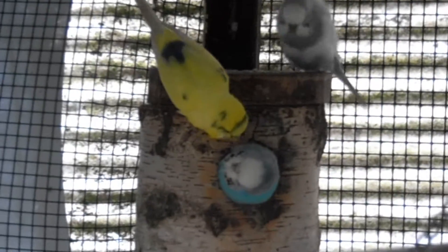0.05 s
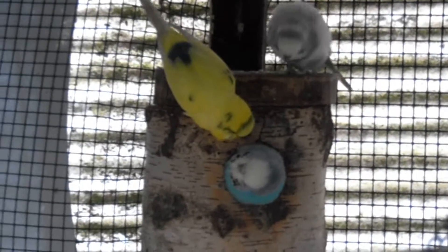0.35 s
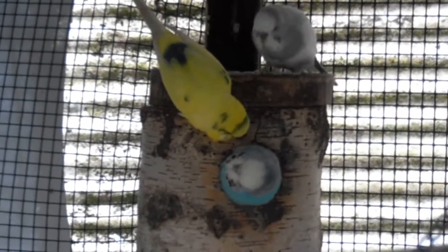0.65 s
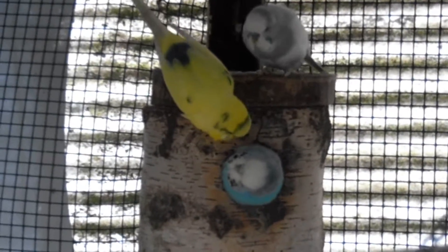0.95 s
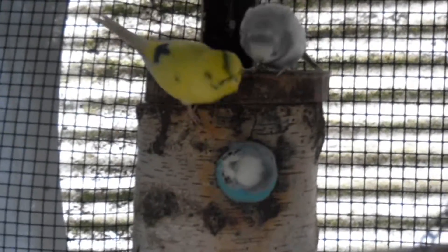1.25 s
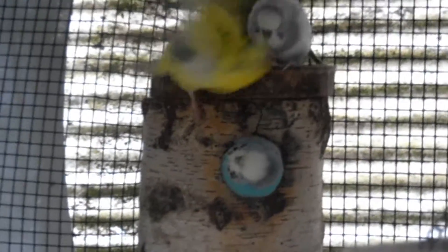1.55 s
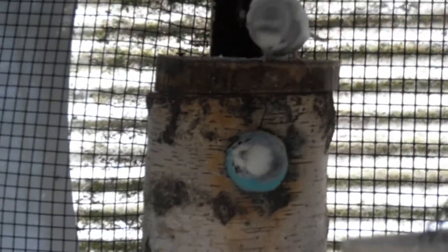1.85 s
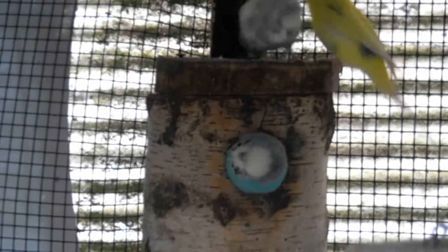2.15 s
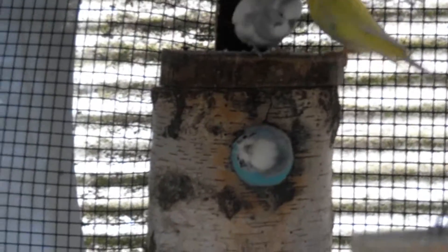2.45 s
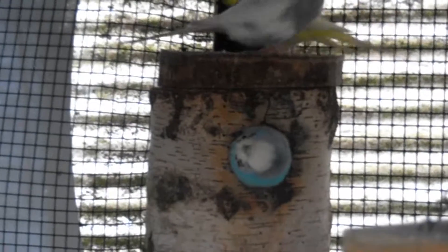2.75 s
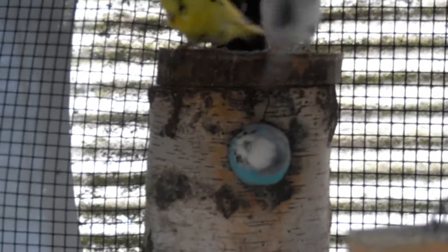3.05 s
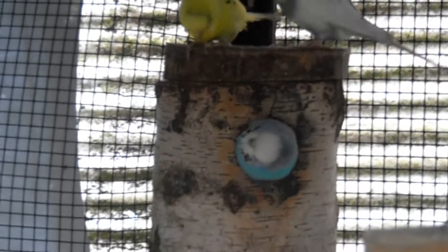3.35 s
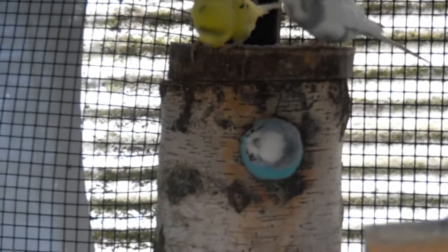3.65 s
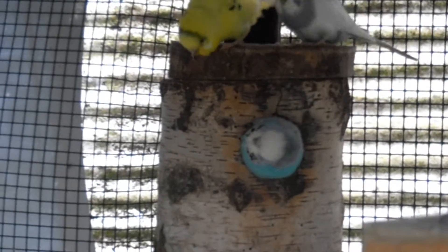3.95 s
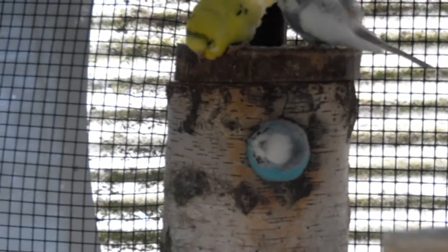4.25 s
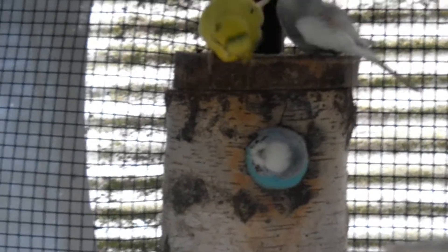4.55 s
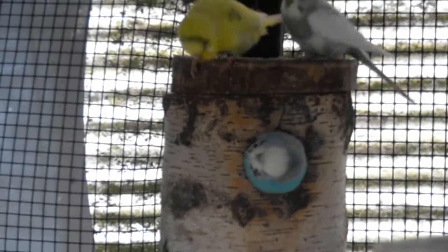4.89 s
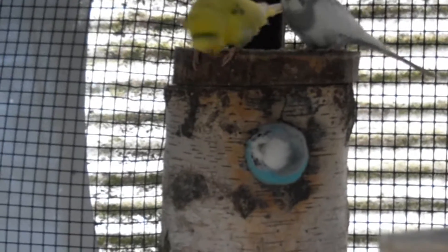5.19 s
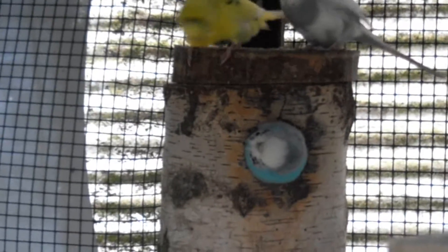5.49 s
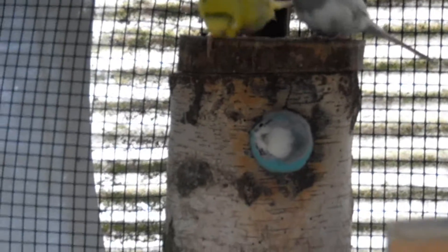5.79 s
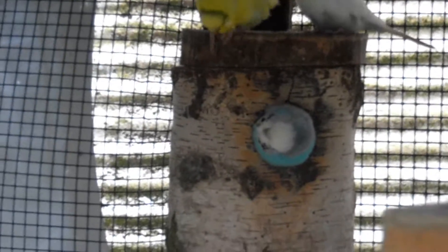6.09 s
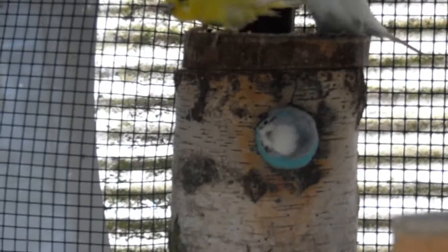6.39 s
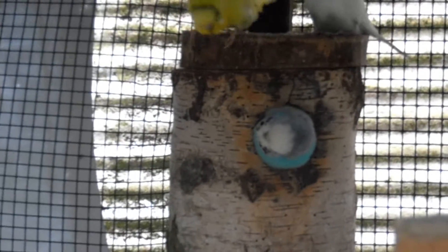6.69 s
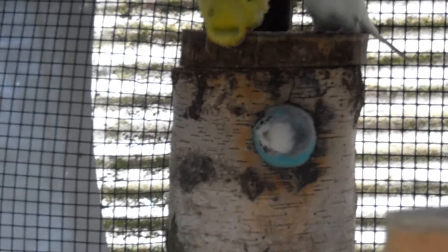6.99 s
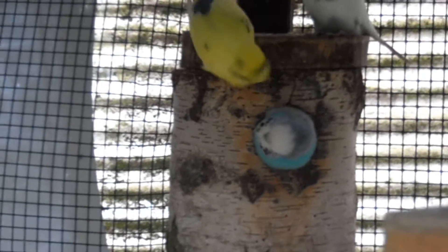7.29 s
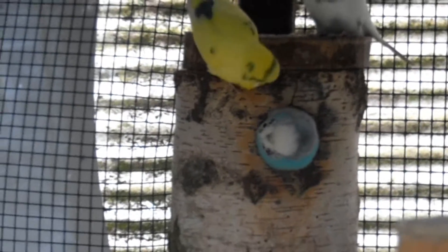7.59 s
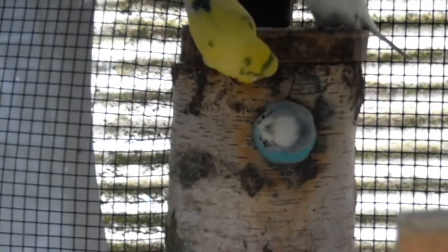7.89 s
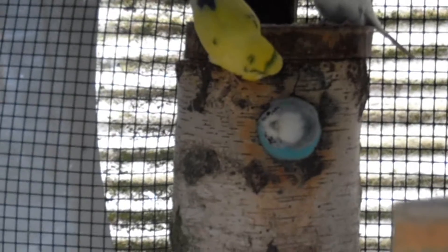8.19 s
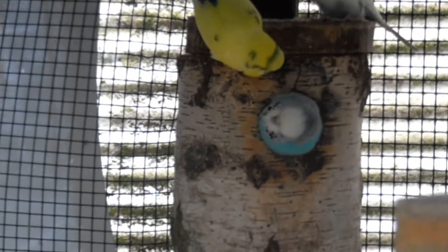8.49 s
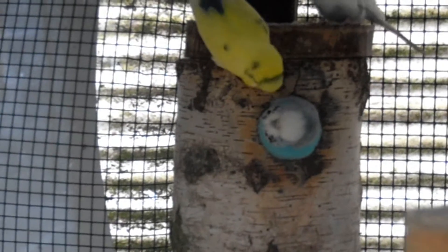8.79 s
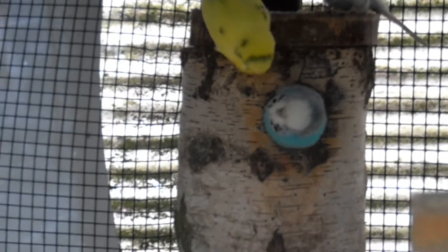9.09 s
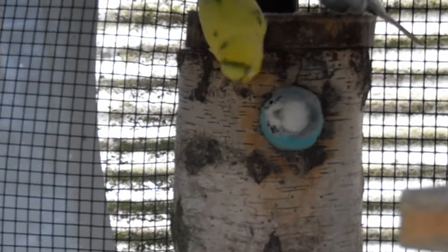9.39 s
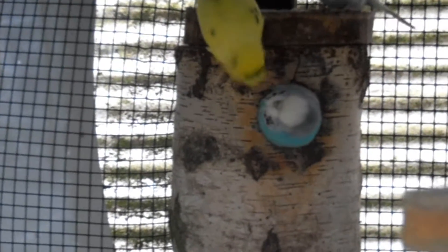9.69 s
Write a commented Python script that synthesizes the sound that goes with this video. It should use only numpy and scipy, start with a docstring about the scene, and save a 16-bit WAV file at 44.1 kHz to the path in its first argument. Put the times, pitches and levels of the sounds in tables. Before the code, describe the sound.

Close to the microphone in an outdoor aviary, budgerigars twitter softly and warble, with a rasp, a dull tap on a hollow log and a few sharp chips. One flies up with soft wing puffs amid very loud, harsh squawks. Lighter chatter then carries on, with scattered chips, rasps and a second tap near the end. A distant rumble and hiss run underneath, and the near walls add a brief echo.

```python
"""An outdoor aviary, the microphone close to budgerigars on a log nest box; distant rumble, hiss, a whine.
The birds open with soft twitter and gliding warbles from the syrinx, then a rasp, a tap on the log and
sharp chips. At 1.6 s one flies up, wings puffing air, with very loud, harsh squawks.
From 3 s the chatter carries on, with a second tap near the end; the close walls answer briefly."""
import sys
import numpy as np
from scipy import signal
from scipy.fft import rfft, irfft, next_fast_len
from scipy.io import wavfile
from scipy.ndimage import map_coordinates

SR = 44100
rng = np.random.default_rng(int(sys.argv[2]) if len(sys.argv) > 2 else 0)


def waveform_to_disk(signal):
    """Save audio, clipped to [-1, 1], as 16-bit WAV at the path in sys.argv[1]."""
    frames = np.transpose(np.atleast_2d(signal))
    scaled = np.clip(frames, -1, 1) * 32767
    samples = np.round(scaled).astype(np.int16)
    wavfile.write(sys.argv[1], SR, samples)


N = 438347
TOP_HZ = 15900  # highest frequency heard


def amp(db):
    """Decibels to gain."""
    return 10 ** (np.asarray(db) / 20)


def interval(semitones):
    """Semitones to a pitch ratio."""
    return 2 ** (semitones / 12)


def unit(x):
    """Scaled to rms 1."""
    return x / np.sqrt(np.mean(x ** 2) + 1e-20)


def along(points, hz):
    """Read (Hz, value) points on a log frequency axis."""
    point_hz, values = np.transpose(points)
    return np.interp(np.log(hz + 1), np.log(point_hz + 1), values)


def wobble(rate, size):
    """A smooth random curve, rate knots a second."""
    knots = rng.standard_normal(size // 4 + 8)
    return map_coordinates(knots, [np.arange(size) * rate / SR + 2], mode="mirror")


def filtered(x, response):
    """Filter x by a gain given as a function of frequency."""
    padded = next_fast_len(len(x) + 2048)
    return irfft(rfft(x, padded) * response(np.fft.rfftfreq(padded, 1 / SR)), padded)[:len(x)]


def noise(spectrum, size):
    """Coloured noise of rms 1."""
    return unit(filtered(rng.standard_normal(size), lambda hz: amp(along(spectrum, hz))))


def add(track, start_s, sound):
    """Mix a sound in at start_s."""
    start = max(round(start_s * SR), 0)
    track[start:start + len(sound)] += sound[:len(track) - start]


def glide(t, length, start, middle, end):
    """The pitch arches through three points."""
    u = np.clip(t / length, 0, 1)
    return start * (1 - u) * (1 - 2 * u) + middle * 2 * u * (2 - 2 * u) + end * u * (2 * u - 1)


def swell(t, length, rise, fall):
    """Airflow opens and closes smoothly; rise and fall are shares of the length."""
    u = t / length
    opening = np.clip(np.minimum(u / rise + .22, (1 - u) / fall + .3), 0, 1)
    return np.sin(np.pi / 2 * opening) ** 2


def cycles(hz):
    """Running phase of a changing pitch."""
    return 2 * np.pi * np.cumsum(hz) / SR


def partials(phase, weights, unrest_db, rate):
    """Multiples 2, 3, .. of a phase, each swelling and fading on its own."""
    return unit(sum(
        weight * amp(unrest_db * wobble(rate, len(phase))) * np.sin(k * phase + 2 * np.pi * rng.random())
        for k, weight in enumerate(weights, 2)))


# Rumble from far beyond the aviary: frequency_hz, relative_db
RUMBLE_SPECTRUM = [(12, -42), (20, -7.5), (54, -4.5), (145, -3.5), (212, -2.5), (376, -8.5), (414, -7.5),
                   (501, -9.5), (939, -11.5), (1900, -29), (2470, -44), (4180, -120)]
# Hiss behind the birds: frequency_hz, relative_db
HISS_SPECTRUM = [(1000, -45), (1700, -5), (1920, 1.5), (2030, 0.5), (2190, 2), (2680, 1.5), (3290, -4),
                 (5250, -4), (6690, -2.5), (7760, -8.5), (8440, -6.5), (15800, -21)]
# A whine, faint at the microphone: pitch_hz, relative_db
WHINE_TONES = [(7865, -61)]


def background(rumble_db=-25.5, hiss_db=-40):
    """A distant outdoor rumble that drifts a little, even hiss and a thin steady whine."""
    t = np.arange(N) / SR
    rumble = amp(rumble_db + 0.7 * wobble(1.397, N)) * noise(RUMBLE_SPECTRUM, N)
    hiss = amp(hiss_db) * noise(HISS_SPECTRUM, N)
    whine = sum(amp(db + 6) * unit(np.sin(2 * np.pi * hz * t)) for hz, db in WHINE_TONES)
    return rumble + hiss + whine


# The colour the beak gives to breath and rasp in every call: frequency_hz, relative_db
BEAK_SPECTRUM = [(710, -41), (1200, 5), (1940, -6), (2360, -8), (3140, -3), (3650, -10.5), (4150, -3.5),
                 (5090, -2.5), (6310, 1.5), (7480, -3.5), (10100, -11), (11600, -29.5), (15500, -27)]
# Soft twittering at the nest box: start_s, end_s, level_db, middle_pitch_hz
TWITTER_BOUTS = [(0.0, .08, -36, 3300), (0.171, 1.102, -41, 2367), (1.2, 1.38, -36, 3060),
                 (2.355, 3.001, -38, 3345), (3.535, 3.696, -35, 3580), (3.897, 4.17, -40, 3390),
                 (5.097, 5.598, -40, 3530), (5.798, 5.926, -33.5, 3530), (8.265, 8.501, -33.5, 2615)]


def twitter(per_second=42, spread_db=5):
    """Bouts of tiny scratchy syllables tumble out, most falling, some rising."""
    out, t = np.zeros(N), np.arange(SR // 24) / SR
    for start_s, end_s, db, middle_hz in TWITTER_BOUTS:
        for slot_s in np.arange(start_s, end_s, 1 / per_second):
            late, long, high, bend, slope, loud, scratch = rng.random(7)
            length = .008 + .022 * long
            hz = middle_hz * 2 ** (.8 * (high - .6))
            tilt = slope / 2 - .2
            pitch = glide(t, length, hz * (1 + tilt), hz * (.9 + .2 * bend), hz * (1 - tilt))
            phase = cycles(pitch * (1 + .08 * scratch * wobble(1100, len(t))))
            breath = .5 * scratch * noise(BEAK_SPECTRUM, len(t))
            voice = unit(np.sin(phase) + 0.42 * np.sin(2 * phase) + breath)
            gain = amp(db + spread_db * (2 * loud - 0.5))
            add(out, slot_s + late / per_second, gain * voice * swell(t, length, rise=0.23, fall=0.66))
    return out


# The throat's filter on the overtones: frequency_hz, relative_db
THROAT_RESPONSE = [(1500, -21), (3200, -2), (7000, -4), (9000, -5), (14000, -36)]
# Notes close to the microphone, each starting a scoop above its pitch (below if negative):
# start_s, length_s, pitch_hz, scoop_semitones, relative_db, overtones_over_fundamental_db
WARBLE_NOTES = [(0.077, 0.076, 2920, -2, -37, -12), (0.737, 0.012, 2720, -3.5, -23, 1),
                (.752, 0.024, 4080, -3.5, -32, -20), (1.384, 0.046, 1886, 2, -33, -16),
                (1.43, 0.064, 2970, -3, -24, -15), (2.455, 0.054, 3157, 1.5, -24.5, -13),
                (2.592, 0.049, 1454, 0.5, -22.5, 12), (2.653, 0.068, 3150, -6, -28.5, -10),
                (2.877, .02, 5400, -3, -30, -27), (2.894, 0.019, 3220, 3, -31, 6),
                (3.021, .017, 4800, -5.5, -19, -16), (3.041, .035, 3013, 1.5, -20, -6),
                (3.079, 0.037, 2240, -1, -21, 4), (3.33, .058, 2555, 7, -29.5, -9.5),
                (3.397, .025, 3320, -0.5, -25, -11), (3.601, .028, 2700, 8, -38, 17),
                (3.68, 0.095, 2070, 5.5, -32, -14), (4.885, 0.076, 2052, 11, -28.5, -3),
                (4.942, .034, 3020, 1.5, -26, -3), (4.972, 0.036, 2680, -2.5, -25, -11),
                (5.174, 0.017, 2930, 2, -30.5, -14), (5.235, 0.04, 3250, -1.5, -29.5, -9),
                (5.286, 0.04, 2516, 1, -30, -9), (5.605, 0.037, 2442, 10.5, -29.5, 0),
                (5.627, .036, 2213, 2, -21.5, 2), (5.866, 0.083, 2730, 0.5, -32, -5),
                (5.915, 0.041, 2210, 1, -20, 6.5), (6.536, .12, 1786, -2, -30.5, 3),
                (6.653, 0.048, 2955, -6, -25, 1), (6.777, 0.05, 3720, 3, -27.5, -3),
                (7.052, 0.035, 3030, 5.5, -31, -3), (7.122, 0.032, 2600, 1, -33, -8),
                (7.163, 0.039, 2640, -3, -26.5, -12), (7.605, 0.075, 2230, 8, -31.5, -7),
                (7.752, 0.068, 1810, -3.5, -28, -0.5), (7.821, 0.066, 2910, -2, -26, -16),
                (7.878, 0.061, 1727, 2.5, -26.5, 2), (7.946, 0.0255, 2690, 0, -25, -18),
                (8.52, 0.013, 2050, 0.5, -22, -12), (8.844, 0.018, 2690, 2, -28, -17),
                (8.896, 0.083, 2423, 3.5, -27.5, -9.5), (9.102, 0.011, 4430, 1, -23, -24),
                (9.118, 0.038, 3380, -2.5, -31, -13), (9.161, 0.045, 2730, 7.5, -27.5, -11),
                (9.217, 0.031, 2320, 0.5, -26.5, -8), (9.245, .016, 3220, -1.5, -19, -16),
                (9.312, 0.027, 4330, 2.5, -21, -24), (9.489, 0.018, 4520, 0, -22.5, -11),
                (9.522, 0.027, 2866, 0, -19, 6.5), (9.594, 0.027, 2313, -1, -24, 6)]


def warble(jitter=0.084, flutter_db=6, breathiness=0.64, rolloff=1.58, trill_depth=0.059, trill_hz=95):
    """Each note is a gliding syrinx tone with overtones; the rough ones trill, buzz and flutter."""
    out, t = np.zeros(N), np.arange(SR // 8) / SR
    k = np.arange(2, 7)[:, None]
    for start_s, length, hz, scoop, db, overtones_db in WARBLE_NOTES:
        # low notes are rough, high notes are purer whistles
        rough = np.clip(0.336 - .1 * np.log2(hz / 2450), 0, 1)
        contour = glide(t, length, hz * interval(scoop), hz * interval(0.23 * scoop), hz)
        waver = .016 * wobble(240, len(t))
        # the syrinx flicks briefly into another register
        flicks = .12 * np.tanh(wobble(150, len(t)) ** 3)
        trill = trill_depth * np.sin(2 * np.pi * (trill_hz * t + rng.random()))
        shake = flicks + trill + jitter * wobble(1078, len(t))
        pitch = contour * (1 + waver + rough * shake)
        phase = cycles(pitch)
        weights = amp(along(THROAT_RESPONSE, k * np.abs(pitch))) * k ** -rolloff * (k * pitch < TOP_HZ)
        overtones = amp(overtones_db) * partials(phase, weights, unrest_db=6.0, rate=147)
        buzz = 1 + rough ** 2 * np.sin(phase / 4)
        catches_db = 2.4 * wobble(130, len(t))
        flutter = unit(buzz * amp(catches_db + rough * flutter_db * wobble(692, len(t))))
        breath = breathiness * rough * noise(BEAK_SPECTRUM, len(t))
        voice = unit(unit(np.sin(phase)) + overtones + breath)
        add(out, start_s, amp(db + 2) * voice * flutter * swell(t, length, rise=0.12, fall=0.2))
    return out


# Harsh calls at close range: start_s, length_s, pitch_hz, sweep_semitones, relative_db
SQUAWK_CALLS = [(.381, 0.043, 5690, -1, -24.5), (.876, .024, 5040, 1, -26), (.987, 0.021, 5170, -0.5, -7.5),
                (1.551, 0.066, 5540, -0.5, -14), (1.69, 0.042, 5210, 3.5, -10), (1.8, 0.063, 4480, 8, -4),
                (1.932, 0.066, 5875, 6.5, -1), (1.989, 0.027, 5130, 2, -4), (2.082, 0.054, 4040, 3.5, -7.5),
                (2.18, 0.056, 4685, -3.5, -2), (2.291, 0.067, 5560, -1, -16.5),
                (2.533, 0.075, 4960, 4, -24), (2.778, .033, 5480, -1, -19), (2.972, 0.037, 4570, 2, -23.5),
                (3.035, 0.025, 4700, -4.5, -21), (4.087, 0.055, 6460, 3.5, -31),
                (4.349, .094, 5520, -1, -22), (4.521, 0.078, 5940, -0.5, -18),
                (4.709, 0.037, 3440, -4, -20), (6.349, 0.047, 4026, -3.5, -22),
                (8.184, 0.068, 5620, 3, -19.5), (8.358, 0.038, 5400, 0, -28), (8.431, .035, 5100, 0, -32),
                (8.647, .028, 4000, 2, -26.5), (9.33, .025, 4520, -0.5, -23.5),
                (9.396, 0.077, 6480, 3, -12), (9.544, 0.049, 5260, 1, -22.5)]


def squawks(chaos=0.075, throb_db=2, throb_hz=300, breath_db=-6, odd_db=-3):
    """Pressed hard, the syrinx shakes chaotically: a torn tone in a rasp of quarter-pitch sidebands."""
    out, t = np.zeros(N), np.arange(SR // 8) / SR
    k = np.arange(2, 11)[:, None]
    for start_s, length, hz, sweep, db in SQUAWK_CALLS:
        tone_db = 3.5 + 0.43 * db  # softer calls are mostly rasp
        centre = glide(t, length, hz / interval(sweep / 2), hz, hz * interval(sweep / 2))
        lurch = .055 * wobble(240, len(t))
        phase = cycles(centre * (1 + lurch + chaos * wobble(2200, len(t))))
        tone = amp(tone_db) * unit(np.sin(phase) * amp(4.6 * wobble(386, len(t))))
        # the half-pitch series is the stronger one; the beak colours each call a little differently
        colour_db = along(BEAK_SPECTRUM, k * centre / 4) + 2 * rng.standard_normal(k.shape)
        rasp = partials(phase / 4, amp(colour_db + odd_db * (k % 2)), unrest_db=5, rate=700)
        throb = np.sin(cycles(throb_hz * (1 + wobble(137.2, len(t)) / 2)))
        breath = amp(breath_db) * noise(BEAK_SPECTRUM, len(t))
        voice = unit(amp(throb_db * throb) * (tone + rasp + breath))
        add(out, start_s, amp(db + 1) * voice * swell(t, length, rise=0.53, fall=0.7))
    return out


# Resonances of the hollow log: pitch_hz, gain_db, t60_s
LOG_MODES = [(910, 20.5, 0.046), (1090, 17.5, 0.042)]
# Knocks on the nest box, near the microphone: start_s, relative_db
LOG_TAPS = [(0.501, -31), (8.661, -31)]


def taps(attack_s=.004):
    """Beaks and claws knock dully on the hollow log."""
    out, t = np.zeros(N), np.arange(SR // 10) / SR
    for start_s, db in LOG_TAPS:
        ring = sum(amp(db + gain_db + rng.normal(0, 1) - 60 * t / t60) * np.sin(2 * np.pi * hz * t)
                   for hz, gain_db, t60 in LOG_MODES)
        add(out, start_s, ring * (1 - np.exp(-t / attack_s)))
    return out


# Short chips, sharp at this close range: time_s, relative_db, high_ring_hz
CHIP_CALLS = [(0.817, -4, 5550), (1.0215, -11, 5190), (1.1604, 0, 6800), (1.477, -18, 8100),
              (2.281, -11, 5100), (2.819, 1.5, 5480), (4.2716, -2.5, 5250), (4.3046, 0, 4770),
              (4.7143, 2.5, 5530), (5.648, -7, 5930), (6.7034, -2, 5620), (6.8464, -1, 5520),
              (7.3397, -7, 5650), (7.9786, -8.5, 5920), (8.3439, -5.5, 5300), (8.522, -7.5, 6040),
              (8.5988, -3.5, 6570), (8.6422, -4.5, 5960), (8.6606, -4, 6050), (8.9865, -12, 9100)]


def chips(attack_s=0.0012, t60_s=0.012, tail_db=-17, tail_t60_s=0.088, low_hz=2800, low_db=-6):
    """One abrupt puff rings the throat at a high and a low resonance, then crumbles away."""
    out, t = np.zeros(N), np.arange(SR // 16) / SR
    for time_s, db, high_hz in CHIP_CALLS:
        high = np.sin(cycles(high_hz * (1 + 0.059 * wobble(1580, len(t)))))
        low = amp(low_db) * np.sin(cycles(low_hz * (1 + 0.148 * wobble(1740, len(t)))))
        crumble = amp(tail_db - 60 * t / tail_t60_s + 5.2 * wobble(330, len(t)))
        puff = (1 - np.exp(-t / attack_s)) * (amp(-60 * t / t60_s) + crumble)
        voice = unit(high + low + 0.82 * noise(BEAK_SPECTRUM, len(t)))
        add(out, time_s - .001, amp(db - 1) * puff * voice)
    return out


# The rush of air at the microphone over one short flight: time_s, relative_db
FLIGHT_LEVELS = [(1.6, -30), (1.8, -24.5), (2.9, -35)]


def wings(beat_hz=15, stroke_db=15, trim_db=-5):
    """Wing strokes push soft puffs of air as a bird flies up and lands."""
    t = np.arange(N) / SR
    times_s, levels_db = np.transpose(FLIGHT_LEVELS)
    flight = amp(np.interp(t, times_s, levels_db, left=-120, right=-120) + trim_db)
    beat = np.sin(cycles(beat_hz * (1 + 0.063 * wobble(4.65, N))))
    strokes = unit(amp(stroke_db * beat))
    air = noise([(80, -21), (450, 7.0), (1200, -13), (2500, -7), (8000, -10.5), (15000, -36)], N)
    return flight * strokes * air


def small_throat(x, cutoff_hz=2000):
    """So small a throat radiates almost nothing below its lowest resonance."""
    return filtered(x, lambda hz: hz ** 6 / (hz ** 6 + cutoff_hz ** 6))


# How fast sound dies away inside the enclosure: frequency_hz, t60_s
AVIARY_DECAY = [(6000, 0.18), (14000, 0.13)]


def aviary(x, walls_db=-7, tail_db=-17, echoes=8):
    """Near walls and roof throw back a few copies, then a short diffuse tail."""
    hz, t, spectra = signal.stft(rng.standard_normal(SR // 3), SR, nperseg=256)
    decay = amp(-60 * t / along(AVIARY_DECAY, hz)[:, None])
    tail = signal.istft(spectra * decay, SR, nperseg=256)[1]
    answer = amp(tail_db) * tail / np.linalg.norm(tail)
    for delay, strength in rng.random((echoes, 2)):
        echo = amp(walls_db) * (.5 + strength) / np.sqrt(echoes)
        add(answer, 0.00091 + .012 * delay, np.array([echo]))
    return x + signal.fftconvolve(x, answer)[:N]


def scene():
    """The birds close by in their enclosure, the background behind them, in mono."""
    birds = warble() + small_throat(squawks() + chips()) + twitter() + taps() + wings()
    return (aviary(birds) + background())[None]


def record(dry):
    """The loudest calls clip at full scale; nothing above 15.9 kHz is kept."""
    clipped = np.clip(dry[0], -1, 1)
    return filtered(clipped, lambda hz: hz < TOP_HZ)[None]


dry = scene()
out = record(dry)
waveform_to_disk(out)
```